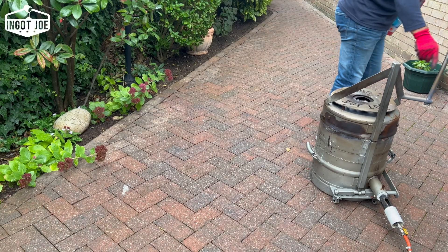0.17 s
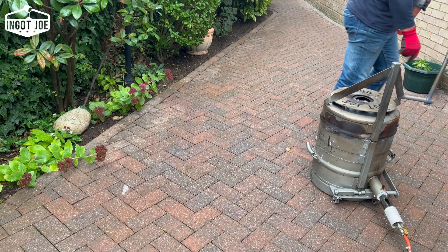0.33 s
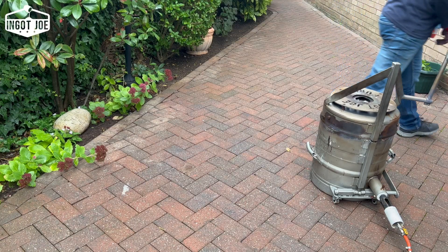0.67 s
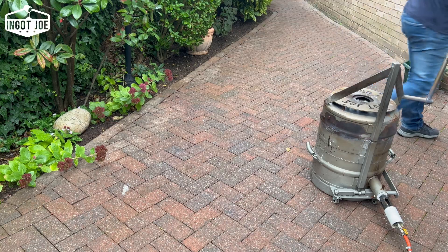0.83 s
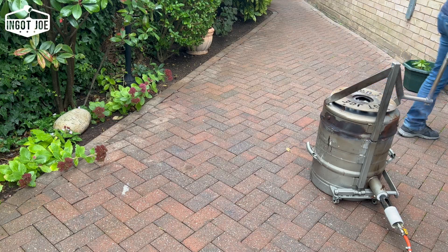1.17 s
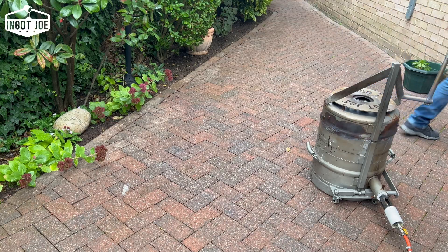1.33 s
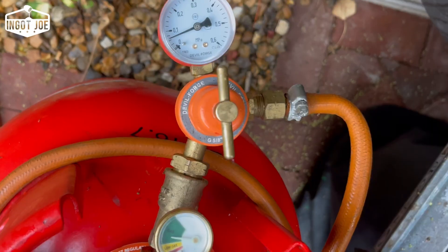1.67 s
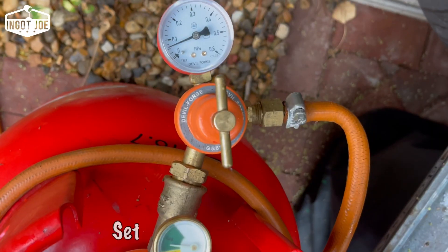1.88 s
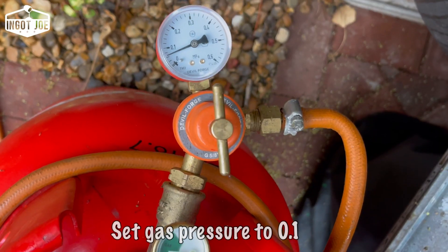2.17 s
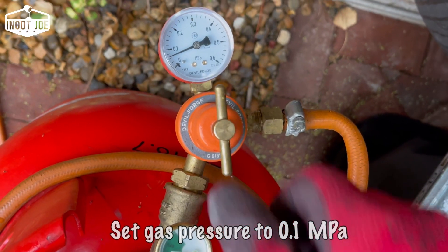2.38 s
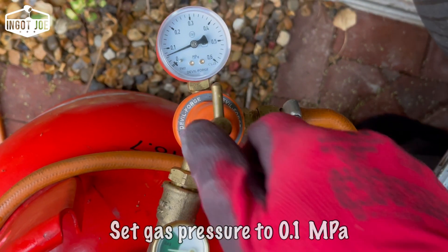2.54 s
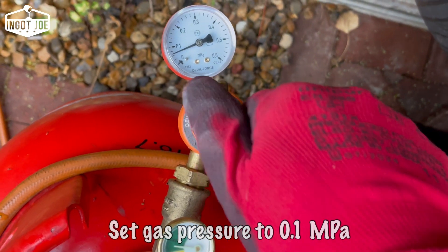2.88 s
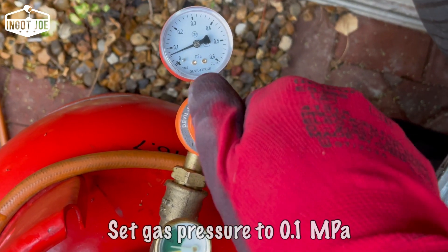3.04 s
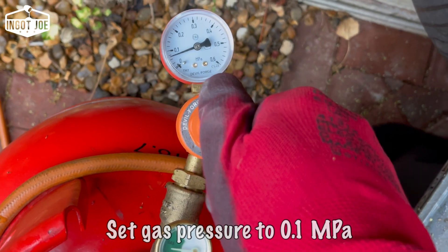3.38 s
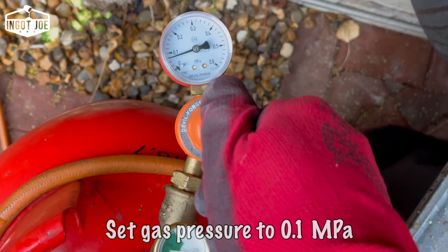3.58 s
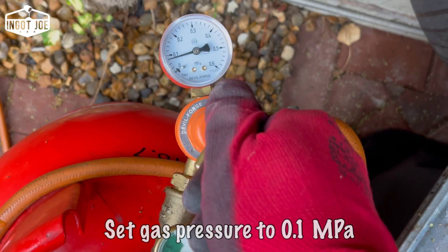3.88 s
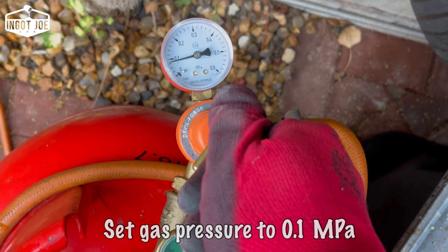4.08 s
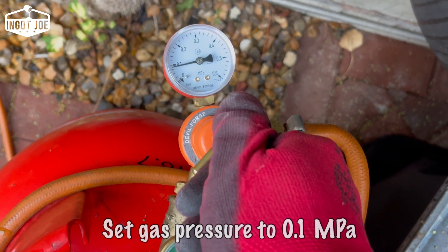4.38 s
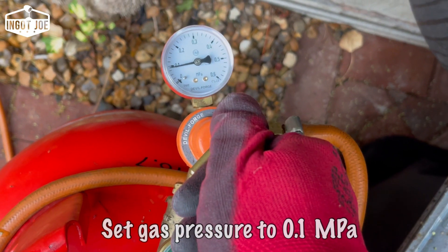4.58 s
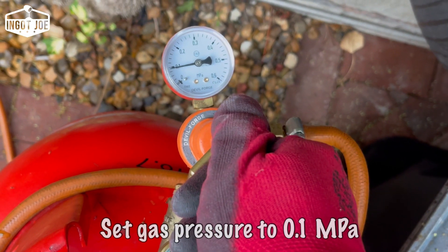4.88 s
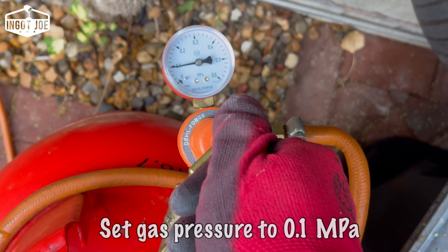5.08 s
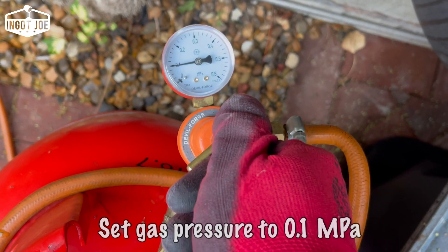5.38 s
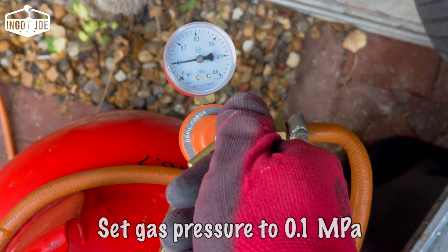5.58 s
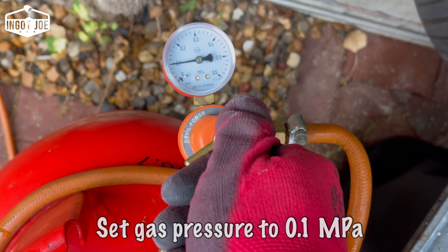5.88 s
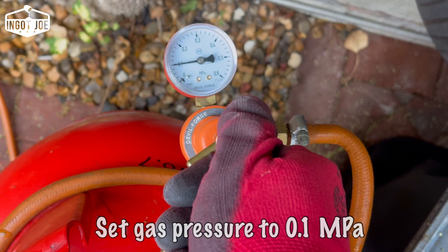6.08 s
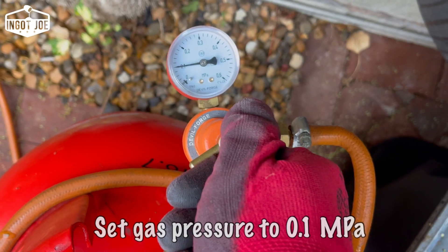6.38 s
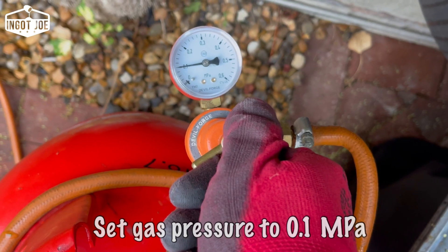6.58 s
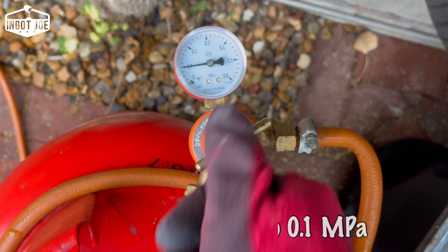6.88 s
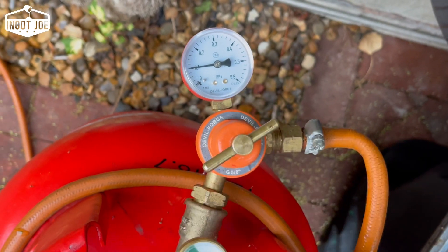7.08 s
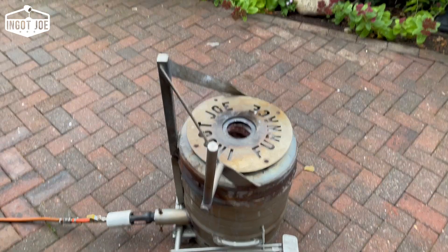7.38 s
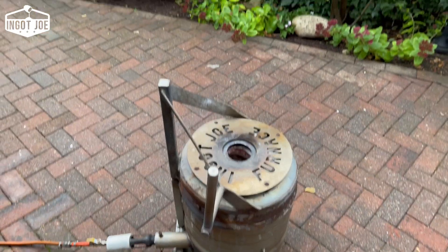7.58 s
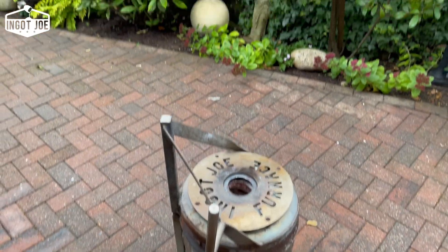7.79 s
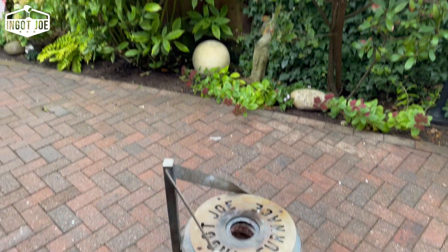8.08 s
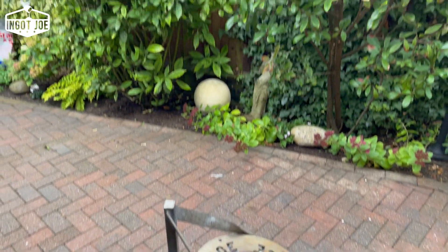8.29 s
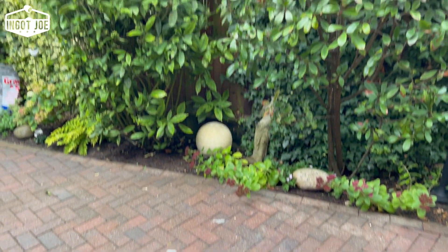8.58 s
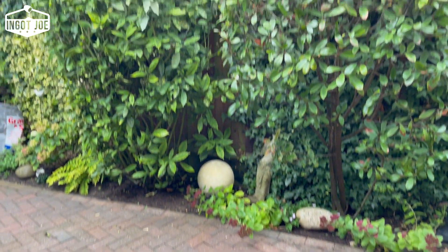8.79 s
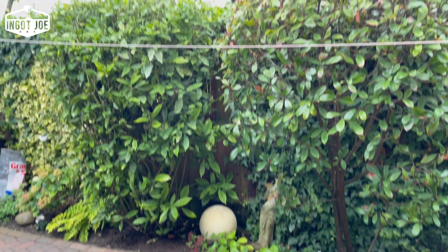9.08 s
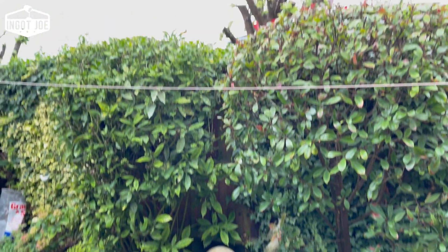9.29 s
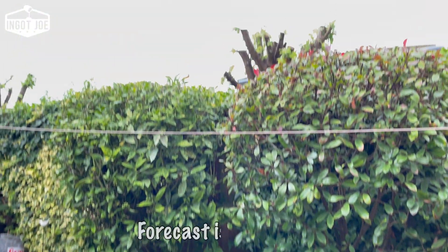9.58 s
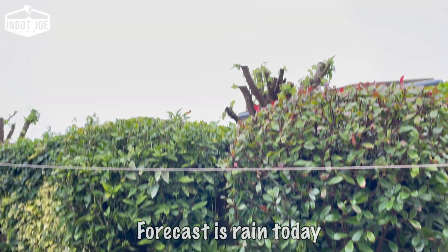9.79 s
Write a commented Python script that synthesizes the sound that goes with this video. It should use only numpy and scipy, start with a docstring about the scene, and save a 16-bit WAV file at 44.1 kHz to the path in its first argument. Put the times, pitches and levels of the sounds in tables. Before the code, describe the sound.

Outdoors on a brick path, a drum furnace burns with a heavy, hollow, low rumble that surges and sags irregularly. Faint rushing air and fine hissing gas sit on top. After a short scuff and a sharp click, more gas makes everything louder and slightly brighter; the roar then continues steadily to the end, broken by one more click. Near, dry stereo pickup.

```python
"""On a paved garden path a propane burner fires into a steel drum furnace.
The flame rumbles in the drum as noise through its resonances, swelling and sagging restlessly.
Drawn-in air rushes through the ringing burner tube and the gas jet hisses, both as coloured noise.
All three swell as the regulator is turned up. A shoe scuffs at the start in gritty noise,
single resonances sing out briefly as sines, and twice the waveform jumps with a dry click."""
import sys
import numpy as np
from scipy import signal
from scipy.fft import rfft, irfft, next_fast_len
from scipy.io import wavfile
from scipy.ndimage import uniform_filter1d, minimum_filter1d, map_coordinates

SR = 44100
rng = np.random.default_rng(int(sys.argv[2]) if len(sys.argv) > 2 else 0)


def log_audio(samples):
    """Write samples as a 16-bit WAV file to the path given in sys.argv[1]."""
    # one column per channel
    frames = np.atleast_2d(samples).T
    # limit to full scale, then quantise
    limited = np.clip(frames, -1, 1)
    pcm = np.round(limited * 32767).astype(np.int16)
    wavfile.write(sys.argv[1], SR, pcm)


N = 438354

# Turbulent burning between the resonances: (frequency [Hz], relative density [dB per Hz])
COMBUSTION_SPECTRUM = [(8, -58.5), (20, -54.5), (38, -43), (52, -9), (80, -12), (105, -6), (200, -38),
                       (250, -45), (350, -35), (450, -38.5), (600, -43.5), (1000, -59), (2500, -100)]
# Resonances of the drum furnace: (frequency [Hz], width [Hz], relative level [dB])
DRUM_MODES = [(62.5, 7.9, -7.5), (100.7, 11.1, 0.4), (115.9, 6.4, 0.4), (133.1, 9.6, 0.5),
              (149.9, 10.7, -1.5), (171.9, 5.8, -4.5), (189.2, 5.3, -12.5), (219.7, 10.8, -10),
              (235.6, 9.5, -15), (257.7, 9.8, -21), (277.1, 12.2, -17.5), (290, 4.9, -20),
              (308.4, 9.8, -24), (327, 11.2, -25.5), (369.1, 14, -24.5), (397.8, 8.3, -27.5),
              (425, 14.4, -31.5), (449, 7.4, -39.5), (475, 7.2, -34), (493, 7.1, -37), (527, 11, -37.5)]
# Level of the four registers at the usual gas flow [dB]
BOOM_DB, RUMBLE_DB, ROAR_DB, RASP_DB = -25.5, -14, -28, -37
# Growth with extra gas [dB per dB of flow]: the higher registers gain more
BOOM_GROWTH, RUMBLE_GROWTH, ROAR_GROWTH, RASP_GROWTH = 0.36, 0.53, 0.7, 1.05
# The rumble surges and sags at random: depth [dB], rate [1/s]
SURGE_DB, SURGE_RATE = 1.13, 26


def flame(extra_flow_db):
    """Turbulent burning excites the drum in four registers; more gas is louder and brighter."""
    burning = drifting(turbulence(COMBUSTION_SPECTRUM, DRUM_MODES), share=0.004, rate=5)

    # split into registers by subtracting neighbouring low-passes
    below_boom_edge = lowpass(burning, edge_hz=81.5)
    below_rumble_edge = lowpass(burning, edge_hz=185.7)
    below_roar_edge = lowpass(burning, edge_hz=302.5)
    boom = steadied(below_boom_edge, span=0.3)
    rumble = steadied(below_rumble_edge - below_boom_edge, span=0.14)
    roar = steadied(below_roar_edge - below_rumble_edge, span=0.24)
    rasp = steadied(burning - below_roar_edge, span=0.23)

    boom_swell_db, rumble_swell_db, roar_swell_db, rasp_swell_db = swells()
    surge_db = SURGE_DB * wobble(SURGE_RATE)
    boom_db = BOOM_DB + BOOM_GROWTH * extra_flow_db + boom_swell_db
    rumble_db = RUMBLE_DB + RUMBLE_GROWTH * extra_flow_db + rumble_swell_db + surge_db
    roar_db = ROAR_DB + ROAR_GROWTH * extra_flow_db + roar_swell_db
    rasp_db = RASP_DB + RASP_GROWTH * extra_flow_db + rasp_swell_db
    return amp(boom_db) * boom + amp(rumble_db) * rumble + amp(roar_db) * roar + amp(rasp_db) * rasp


# Chance swells (+) and sags (-) of the rumbling noise:
# (time [s], rise and decay [s], boom [dB], rumble [dB], roar [dB], rasp [dB])
NOISE_SWELLS = [(0.18, .04, -5, -2, 3.5, -2.5), (0.65, 0.045, 1, 4.5, -2, -1), (1.35, .1, 0, 1, -1.5, -3),
                (1.52, 0.038, -8, -10.5, 3.5, -5.5), (1.65, 0.029, 2, -9.5, -3, -1),
                (1.76, 0.012, -5, -8, -5, 0), (1.8, 0.076, 1, 0, 0, 4.5), (1.91, 0.029, 5, 0, -5, -2),
                (2.12, 0.084, 2, 1, 2.5, -1), (2.38, 0.025, -7, 5.5, 3, 3), (2.79, 0.043, 5.5, -4, -2, -5),
                (3.19, 0.038, 4, 5.5, -1, 0), (3.48, .07, 10, -1, 1.5, 2.5), (3.55, 0.017, 0, -10, 2, -2),
                (3.99, 0.036, -2, -7, 5.5, 1), (4.5, 0.12, -4, 0.5, -3.5, -3.5),
                (4.82, 0.068, -5.5, -0.5, -1, -1.5), (4.99, 0.025, 6, 4, -8, -2),
                (5.08, .07, -4, 1.5, 1, 2.5), (5.39, 0.015, -4, -6, -9, 0), (5.97, .083, -1, 1.5, 1, 2.5),
                (6.28, .07, 9, -0.5, 3, -1), (6.51, 0.018, -4, 10, -7, 1.5), (6.78, 0.11, -2, -0.5, 0, -2),
                (6.92, .0267, -6, 4.5, -1, 2), (7.13, 0.05, 6, 1, -1, 1), (7.46, 0.024, -2, -7, -4, 1.5),
                (7.6, .045, 9, -2, 0.5, -7), (7.87, 0.059, -5, 1, 1, 5.5), (8.23, 0.033, -1, -5.5, -3, 0),
                (8.44, 0.11, 1, -3, 2.5, 2.5), (9.02, .045, 3, 0, -2, -1), (9.36, .05, -3, 1, -1, 1),
                (9.68, .034, 0, -5.5, -3, 0), (9.83, 0.02, 0, 4, 2, -5)]


def swells():
    """Each swell or sag bends the levels of the four registers in one smooth bell, in dB."""
    t = np.arange(N) / SR
    total_db = 0
    for peak_s, width_s, *gains_db in NOISE_SWELLS:
        bell = np.exp(-np.minimum(((t - peak_s) / width_s) ** 2, 20))
        total_db = total_db + np.outer(gains_db, bell)
    return total_db


# Rush of drawn-in air between the resonances: (frequency [Hz], relative density [dB per Hz])
DRAUGHT_SPECTRUM = [(250, -41), (600, -9.5), (800, -11), (1100, -13), (1260, -20.5), (1550, -12),
                    (1900, -14), (2400, -16), (3400, -20.5), (4150, -19), (4450, -29), (4800, -20.5),
                    (7300, -17), (9000, -18.5), (14000, -56)]
# Resonances of the burner tube: (frequency [Hz], width [Hz], relative level [dB])
TUBE_MODES = [(711, 22.7, 2), (648, 44, -1.5), (880.5, 23.4, -8), (959.4, 38, -6), (1056, 170, -12.5),
              (1393.3, 40, -1.5), (1468.5, 52, -11), (2013, 46, -7.5), (2084, 67, -5.5), (2205, 151, -13),
              (2370, 40, -15.5), (2555, 184, -9.5), (2710, 67, -9.5), (2770, 50, -16.5), (3215, 73, -14.5),
              (3700, 50, -14)]


def draught(extra_flow_db, level_db, growth, flutter_db):
    """Air dragged along by the jet rings the tube; its pitch drifts and its bands waver."""
    rush = garden(turbulence(DRAUGHT_SPECTRUM, TUBE_MODES), echo_db=-10.0, spread_s=0.025)
    rush = drifting(rush, share=0.0025, rate=7)
    rush = wavering(rush, depth_db=1.0, width_hz=574.0, rate=24)
    level = level_db + growth * extra_flow_db + flutter_db * wobble(22)
    return amp(level) * rush


# Turbulence of the gas jet between the resonances: (frequency [Hz], relative density [dB per Hz])
JET_SPECTRUM = [(3000, -45), (7000, -6), (9000, -8.5), (10400, 1), (11500, -4), (13000, -7), (13700, -0.5),
                (15000, 1.5), (15800, -6)]
# Resonances of the gas nozzle: (frequency [Hz], width [Hz], relative level [dB])
NOZZLE_MODES = [(5750, 290, -2.5), (5950, 74, 0.5), (6880, 250, -5), (7660, 70, -4.5), (7940, 127, -1.5),
                (8410, 80, -1)]


def jet(flow_db, extra_flow_db, trim_db, flutter_db, fizz_growth):
    """Gas leaves the nozzle in a ringing, fluttering hiss; the fizz on top gains most from extra gas."""
    stream = turbulence(JET_SPECTRUM, NOZZLE_MODES)
    hiss = lowpass(garden(stream, echo_db=-5, spread_s=0.013), edge_hz=9760)
    fizz = stream - lowpass(stream, edge_hz=9340)
    fizz = amp(fizz_growth * extra_flow_db) * fizz
    level_db = flow_db + trim_db + flutter_db * wobble(26)
    return amp(level_db) * (hiss + fizz)


# Single resonances that sing out: (peak time [s], swell and fade [s], frequency [Hz], level [dB])
SINGING_TONES = [(1.38, 0.26, 702, -52.5), (4.89, 0.086, 278.3, -26), (5.15, .04, 279, -25.5),
                 (7.83, .05, 370, -34), (8.52, 0.13, 218.8, -25)]


def singing(waver, waver_rate):
    """Resonances of tube or drum sound briefly as sines, their phase wandering by waver radians."""
    t = np.arange(N) / SR
    total = 0
    for peak_s, swell_s, hz, db in SINGING_TONES:
        phase = 2 * np.pi * hz * t + waver * wobble(waver_rate)
        tone = np.sqrt(2) * np.sin(phase)  # rms 1
        total = total + amp(db) * np.exp(-((t - peak_s) / swell_s) ** 2) * tone
    return total


# A shoe scuffs the paving: (time [s], level [dB], fade [s])
SHOE_SCUFF = (0, -41, 0.045)
# Grit under the sole: (frequency [Hz], relative density [dB per Hz])
GRIT_SPECTRUM = [(300, -26), (900, -10), (1500, -1), (2150, -2), (2600, -12), (3000, -22), (4000, -8),
                 (5000, -25.5), (12000, -37)]


def scuff(rough_db, grain_rate):
    """Grit scrapes under the sole: a short noise of randomly rough level that dies in a half bell."""
    start_s, level_db, fade_s = SHOE_SCUFF
    t = np.arange(N) / SR - start_s
    envelope = (t >= 0) * np.exp(-(t / fade_s) ** 2)
    roughness = amp(level_db + rough_db * wobble(grain_rate))
    return roughness * envelope * turbulence(GRIT_SPECTRUM)


# Dry clicks, jumps in the waveform: (time [s], jump [dB])
WAVEFORM_JUMPS = [(1.662, -9), (7.2038, -8)]


def clicks(rise_s, relax_s):
    """The waveform sinks, jumps up almost at once and relaxes."""
    t = np.arange(N) / SR
    total = 0
    for jump_s, db in WAVEFORM_JUMPS:
        jump = np.tanh((t - jump_s) / rise_s)
        relaxing = np.exp(-np.abs(t - jump_s) / relax_s)
        total = total + amp(db) / 2 * jump * relaxing
    return total


def garden(x, echo_db, spread_s, count=12):
    """Paving, house wall and drum send back weak early copies that comb the sound into fine bands."""
    delays = rng.uniform(0.002, spread_s, count)
    signs = rng.choice([-1, 1], count)
    echoes = sum(sign * np.roll(x, int(s * SR), axis=1) for s, sign in zip(delays, signs))
    return unit(x + amp(echo_db) * unit(echoes))


# Likeness of left and right: (frequency [Hz], coherence [0-1])
STEREO_COHERENCE = [(30, 0.998), (65, 0.98), (125, 1), (220, 0.85), (500, 0.85), (1200, 0.3), (2400, 0.95),
                    (3400, 0.14), (5200, 0.27), (7300, 0.77), (8800, 0.92), (10000, 1), (12000, 0.89),
                    (13400, 1), (15500, .75)]
# Level balance between the sides: (frequency [Hz], right minus left [dB])
STEREO_BALANCE = [(90, 1), (160, -1), (270, 0.7), (740, 2), (1500, 3.5), (3300, -1.3), (5500, 0.5),
                  (15000, 0)]
# Phase between the two microphone ports: (frequency [Hz], lag of left [rad])
STEREO_LAG = [(45, 0.02), (80, 0.1), (125, 0.02), (152, 0.45), (178, 0.2), (196, 0.6), (208, -0.4),
              (228, -0.75), (260, 0.5), (290, 0), (310, -0.9), (326, 0.9), (380, 0.75), (428, 0.1),
              (455, 0.9), (490, 0.65), (700, 0.84), (1500, 1.13), (2700, 0.98), (3700, 1.21), (4400, 1),
              (5700, 2), (6400, 1), (7400, 0.14), (8700, 1.48), (9400, 3), (10800, 3.5), (13200, 6.5),
              (15600, 8)]


def turbulence(spectrum, modes=()):
    """Coloured noise of rms 1 as it arrives at two microphone ports."""
    def shape(hz):
        # a shared and an opposed part, mixed to give the wanted coherence
        turn = np.arccos(np.clip(along(STEREO_COHERENCE, hz), 0, 1)) / 2
        return colour(spectrum, modes, hz) * np.array([np.cos(turn), np.sin(turn)])

    def placing(hz):
        side = np.array([[-0.5], [0.5]])  # left, right
        return amp(side * along(STEREO_BALANCE, hz)) * np.exp(1j * side * along(STEREO_LAG, hz))

    common, apart = filtered(rng.standard_normal((2, N)), shape)
    left_right = np.array([common + apart, common - apart])
    return unit(filtered(left_right, placing))


def colour(spectrum, modes, hz):
    """Gain of a broad spectrum with steep-sided resonances standing on it."""
    power = amp(along(spectrum, hz)) ** 2
    for centre, width, db in modes:
        peak = amp(db) / (1 + ((hz - centre) / (width * np.pi / 4)) ** 2)
        power = power + peak ** 2
    return np.sqrt(power)


def wavering(x, depth_db, width_hz, rate):
    """Eddies feed each band width_hz wide unevenly, changing rate times a second."""
    hz, t, bins = signal.stft(x, SR, nperseg=1024)
    knots = rng.standard_normal((256, 256))
    grid = np.meshgrid(hz / width_hz, t * rate, indexing="ij")
    field = map_coordinates(knots, grid, mode="wrap")
    _, wavered = signal.istft(bins * amp(depth_db * field), SR)
    return unit(wavered[:, :N])


def drifting(x, share, rate):
    """x with its pitch wandering by a small share, rate times a second."""
    position = np.arange(N) + np.cumsum(share * wobble(rate))
    return np.array([map_coordinates(channel, [position], mode="mirror") for channel in x])


def steadied(x, span):
    """x with its swells longer than span seconds evened out."""
    size = max(int(span * SR), 2)
    power = np.mean(x ** 2, axis=0)
    power = uniform_filter1d(uniform_filter1d(power, size), size)
    return x / np.sqrt(np.abs(power) + 1e-9)


def lowpass(x, edge_hz):
    """What lies below edge_hz, with a steep slope."""
    return filtered(x, lambda hz: 1 / (1 + (hz / edge_hz) ** 12))


def filtered(x, response):
    """x shaped by a complex response of frequency."""
    size = next_fast_len(N + SR // 2)
    spectrum = rfft(x, size) * response(np.fft.rfftfreq(size, 1 / SR))
    return irfft(spectrum, size)[..., :N]


def wobble(rate):
    """A smooth random curve, rate knots a second."""
    knots = rng.standard_normal(int(N * rate / SR) + 4)
    return map_coordinates(knots, [np.arange(N) * rate / SR])


def along(points, hz):
    """(frequency [Hz], value) points read on a log frequency axis."""
    f, v = np.transpose(points)
    return np.interp(np.log(hz + 1), np.log(f + 1), v)


def curve(rows):
    """(time [s], value) rows as one value per sample."""
    return np.interp(np.arange(N) / SR, *np.transpose(rows))


def amp(db):
    """Decibels to gain."""
    return 10 ** (np.asarray(db) / 20)


def unit(x):
    """x at rms 1."""
    return x / np.sqrt(np.mean(x ** 2) + 1e-20)


# Gas flow as the regulator is turned up: (time [s], relative level [dB])
GAS_FLOW = [(0, -53), (1.4, -53), (1.8, -52.5), (3.25, -52.5), (4.55, -47), (5.1, -47.5), (6.5, -48),
            (7.55, -47), (8.1, -48), (9.3, -47), (9.94, -47)]


def scene():
    """The burning furnace, with the gas flow driving flame, draught and jet."""
    flow_db = curve(GAS_FLOW)
    extra_flow_db = flow_db - np.median(flow_db)
    fire = flame(extra_flow_db)
    air = draught(extra_flow_db, level_db=-42, growth=0.64, flutter_db=0.5)
    gas = jet(flow_db, extra_flow_db, trim_db=5.5, flutter_db=0.55, fizz_growth=0.08)
    tones = singing(waver=0.73, waver_rate=27)
    shoe = scuff(rough_db=-3.0, grain_rate=290)
    dry_clicks = clicks(rise_s=1.05e-5, relax_s=0.0037)
    return fire + air + gas + tones + shoe + dry_clicks


def record(dry):
    """A smooth gain eases down the highest peaks, then a sharp cut removes the top of the treble."""
    ceiling, window, top_hz = 0.82, SR // 50, 15780
    needed = ceiling / np.maximum(np.abs(dry).max(axis=0), ceiling)
    gain = uniform_filter1d(minimum_filter1d(needed, window), window)
    return filtered(dry * gain, lambda hz: hz < top_hz)


dry = scene()
out = record(dry)
log_audio(out)
```